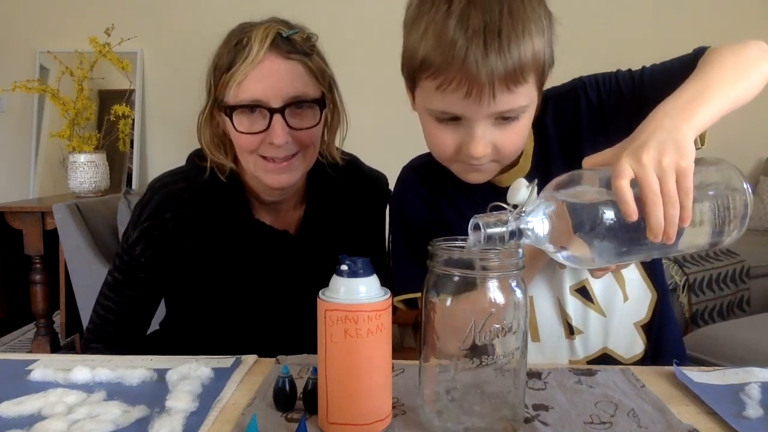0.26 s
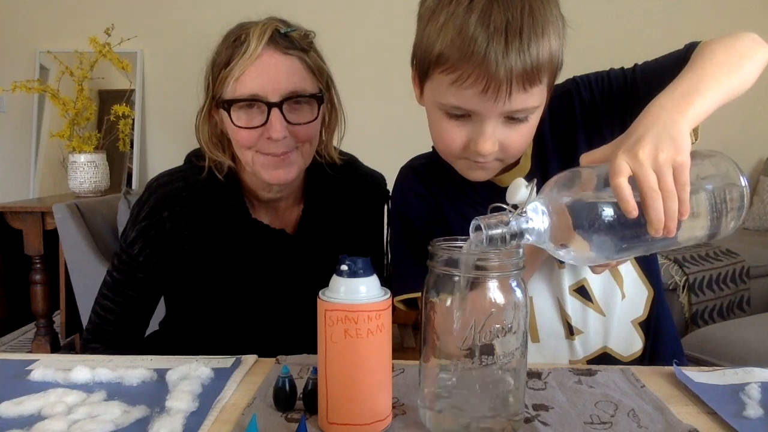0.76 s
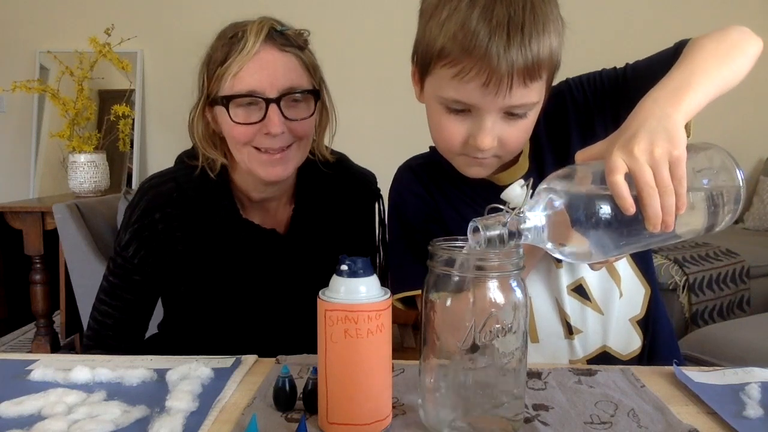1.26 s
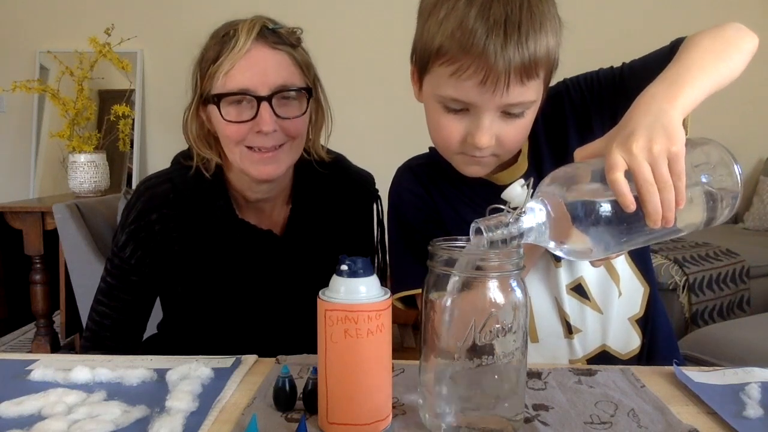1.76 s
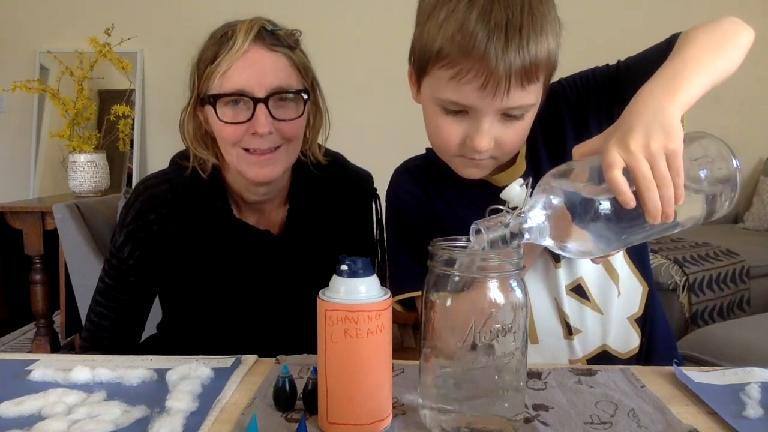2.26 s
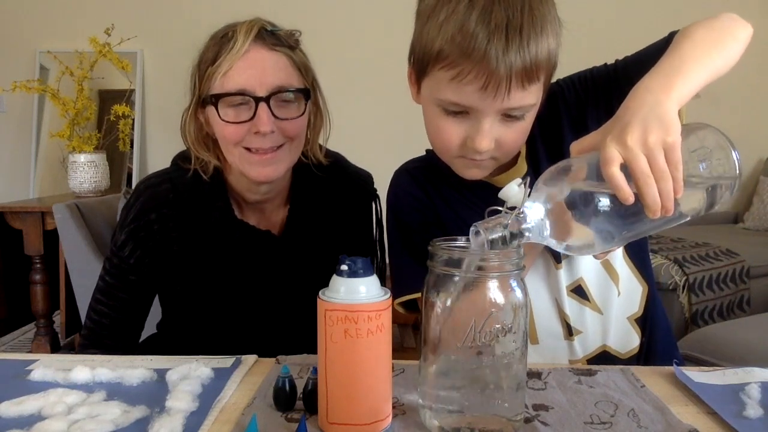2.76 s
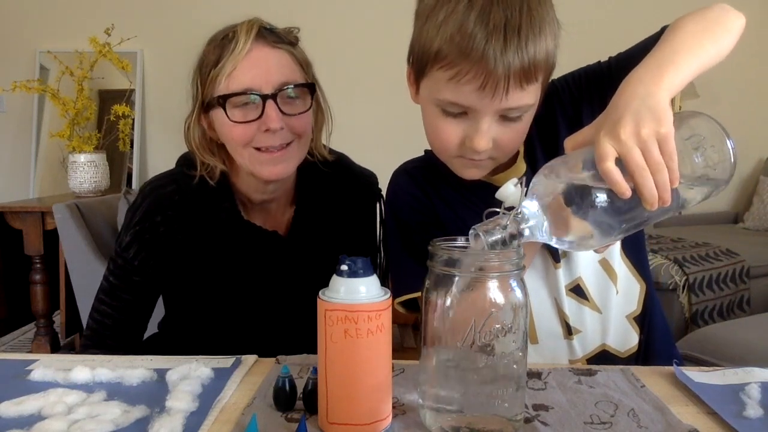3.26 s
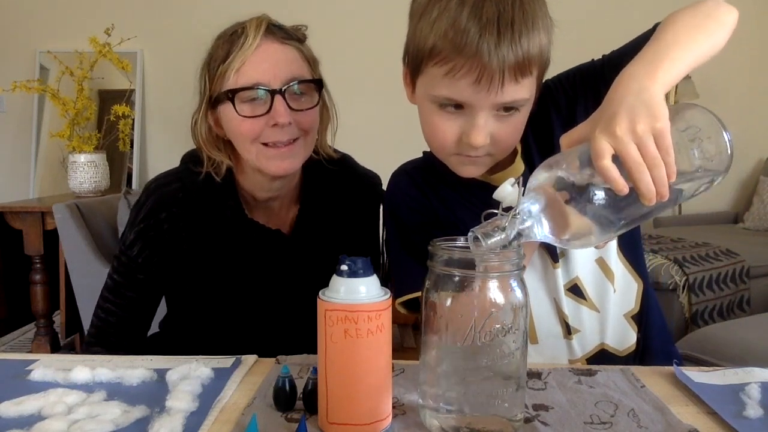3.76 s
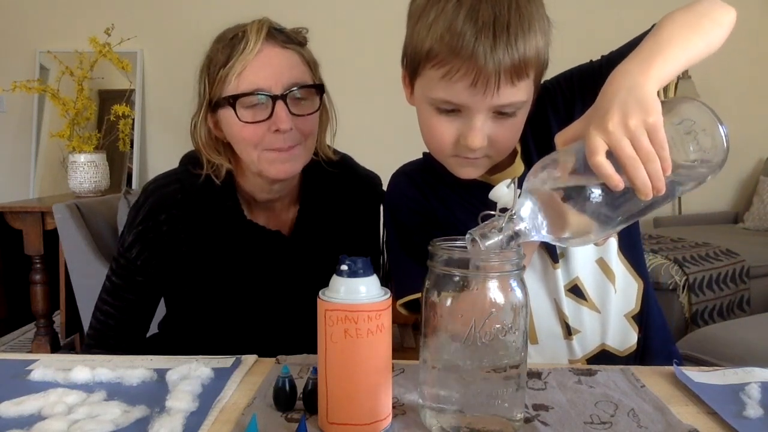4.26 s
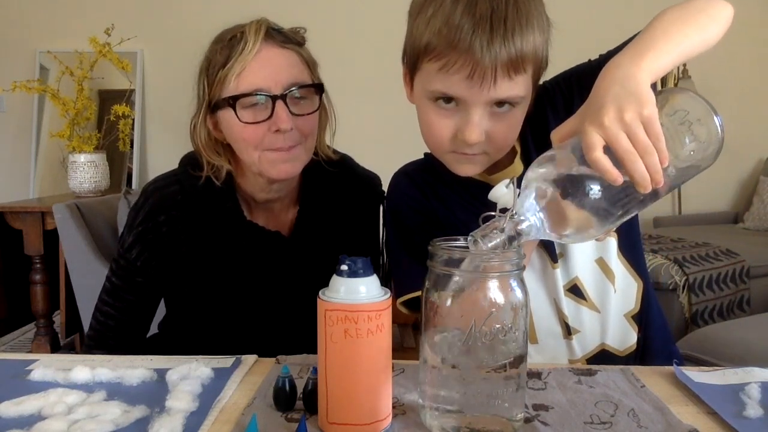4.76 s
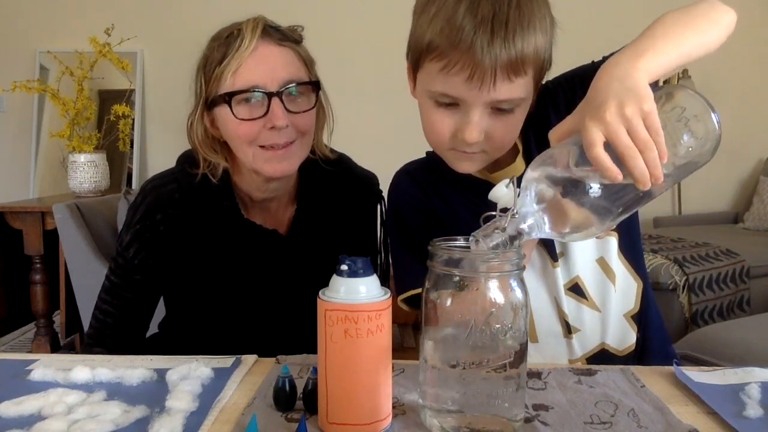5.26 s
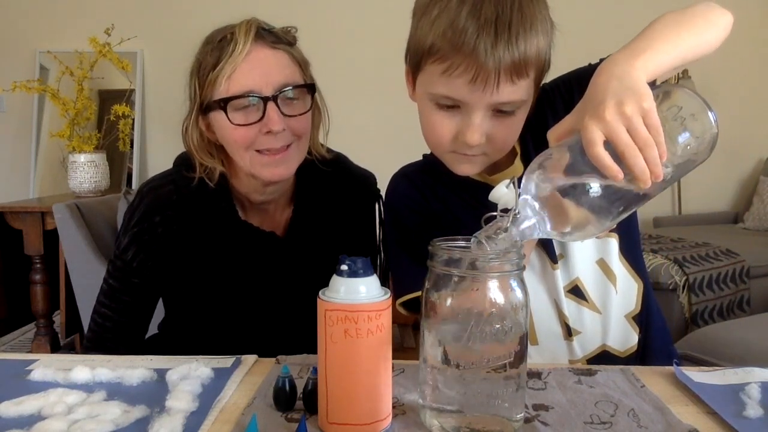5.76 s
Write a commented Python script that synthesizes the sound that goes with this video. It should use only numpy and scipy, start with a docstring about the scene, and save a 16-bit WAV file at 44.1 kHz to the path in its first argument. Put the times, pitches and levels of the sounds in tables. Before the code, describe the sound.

Close, uneven pouring of water into a glass jar, with gulping bubbles, splashing drops and a slowly climbing pitch.

```python
"""Water glugs from a tilted bottle into a glass jar on a table, close to a laptop microphone.
Large bubbles gulp and ring the air in the jar, whose note rises as the jar fills. Lumps of water thud on
the bottom. Drops splash with small bubbles, a crack of spray and a little froth; tiny bubbles fizz
between them. A small furnished room echoes briefly over a faint hum."""
import sys
import numpy as np
from scipy import signal
from scipy.fft import rfft, irfft, next_fast_len
from scipy.io import wavfile

SR = 44100
rng = np.random.default_rng(int(sys.argv[2]) if len(sys.argv) > 2 else 0)


def wav_record(signal):
    """Record a signal, one row per channel, as 16-bit PCM in the file named by sys.argv[1]."""
    frames = np.transpose(np.atleast_2d(signal))
    bounded = np.clip(frames, -1, 1)
    # unit amplitude maps onto the largest positive 16-bit level
    quanta = np.round(bounded * 32767).astype(np.int16)
    wavfile.write(sys.argv[1], SR, quanta)


N = 265437
SPAN = 12288  # samples that one sound lasts with its echoes
LEAD = 4410  # samples of fizz before the start, whose echoes reach into it

# the note of the air in the jar, rising as it fills: (time [s], pitch [Hz])
AIR_NOTE = [(0, 885), (1.5, 933), (3, 1033), (4.2, 1173), (5.2, 1286), (6, 1413)]
# bubbles trapped by falling drops: (time [s], level [dB], pitch [Hz])
PLOPS = [(0.005, -39.5, 3500), (0.022, -45.5, 2920), (0.0422, -35, 4620), (0.091, -40, 2890),
         (0.149, -36, 4500), (0.1905, -35, 5270), (0.199, -38.5, 5370), (0.2787, -42, 2900),
         (0.2957, -40.5, 3140), (0.38, -28.5, 3370), (0.4568, -29.5, 2930), (0.529, -41.5, 3280),
         (0.5776, -32.5, 5400), (0.614, -37, 3380), (0.6196, -28.5, 5250), (0.6564, -31.5, 3050),
         (0.731, -39, 5250), (0.7706, -46, 2030), (0.7896, -42, 3180), (0.8142, -38, 3500),
         (0.833, -35, 2260), (0.9095, -31, 1900), (0.943, -32, 3110), (0.9698, -32.5, 3270),
         (1.02, -37.5, 4520), (1.058, -41, 3370), (1.162, -32, 3200), (1.1918, -34.5, 3090),
         (1.2186, -36, 2960), (1.284, -40, 3640), (1.2963, -35, 3370), (1.335, -30, 5430),
         (1.3524, -41, 3340), (1.359, -30, 3330), (1.4334, -38.5, 2630), (1.4593, -29, 3280),
         (1.496, -46, 5260), (1.5178, -19.5, 3155), (1.578, -58, 3240), (1.583, -40, 2920),
         (1.603, -39, 3120), (1.617, -40, 3160), (1.6686, -50, 2060), (1.699, -34, 3420),
         (1.741, -29, 3600), (1.7667, -43, 3670), (1.8292, -36, 3200), (1.861, -32.5, 3390),
         (1.8643, -39, 3550), (1.951, -32.5, 3220), (1.9653, -33, 3400), (2.007, -33, 3500),
         (2.0582, -27.5, 1720), (2.1178, -33, 1960), (2.148, -37, 3750), (2.176, -42, 2420),
         (2.19, -56, 2800), (2.2257, -38.5, 3500), (2.278, -48, 3880), (2.296, -36.5, 3460),
         (2.347, -37, 5030), (2.3745, -25.5, 3460), (2.4258, -33, 3700), (2.467, -40, 3520),
         (2.4857, -50, 3640), (2.498, -32.5, 4880), (2.607, -36.5, 1960), (2.608, -39, 3680),
         (2.6613, -32.5, 3920), (2.711, -28, 4700), (2.7094, -39, 3480), (2.807, -49, 2160),
         (2.815, -45, 5070), (2.8433, -35, 2300), (2.852, -31.5, 4100), (2.883, -30, 3280),
         (2.9634, -41, 3380), (2.961, -39.5, 3070), (2.9865, -33.5, 3330), (3.019, -43, 4360),
         (3.0654, -26.5, 3880), (3.0976, -41, 4300), (3.158, -32, 3210), (3.2237, -29, 2580),
         (3.223, -27, 4460), (3.32, -31, 2070), (3.3742, -26.5, 4280), (3.373, -33, 2120),
         (3.4122, -28.5, 3800), (3.441, -36, 3700), (3.501, -38.5, 3680), (3.5193, -36.5, 4800),
         (3.542, -26.5, 5140), (3.589, -34.5, 3820), (3.6057, -31, 4730), (3.63, -32.5, 3840),
         (3.701, -26.5, 4220), (3.732, -34.5, 5100), (3.749, -31, 3670), (3.779, -34, 4400),
         (3.796, -27, 4050), (3.823, -32, 4200), (3.8657, -31, 3870), (3.8842, -29, 4770),
         (3.921, -31.5, 3570), (3.936, -29.5, 4400), (3.981, -39, 3700), (4.015, -51, 4300),
         (4.0138, -25.5, 4590), (4.0724, -20, 4120), (4.0739, -28.5, 2820), (4.192, -39, 4380),
         (4.2302, -36.5, 3820), (4.2958, -44, 3680), (4.41, -45, 3800), (4.364, -45.5, 2500),
         (4.4352, -27, 4400), (4.4334, -34, 2700), (4.503, -37, 5160), (4.293, -55, 1980),
         (4.535, -31, 3920), (4.58, -47, 1750), (4.579, -33, 4740), (4.584, -48, 3140), (4.6746, -36, 3550),
         (4.6915, -38.5, 3600), (4.728, -36.5, 4700), (4.762, -41, 2950), (4.7959, -32.5, 3770),
         (4.862, -57, 1980), (4.8939, -22.5, 3620), (4.9816, -43, 3640), (5.004, -38, 2900),
         (5.026, -32.5, 4850), (5.1062, -42, 3560), (5.183, -49, 2650), (5.1937, -39.5, 1890),
         (5.244, -42.5, 3600), (5.251, -35.5, 4640), (5.2908, -25, 4860), (5.337, -40, 5000),
         (5.374, -41, 3330), (5.4093, -25.5, 4650), (5.4097, -32, 3420), (5.502, -47, 3740),
         (5.515, -47.5, 3360), (5.559, -33, 4700), (5.6117, -16.5, 4010), (5.648, -27, 3450),
         (5.7082, -39, 2054), (5.7378, -31, 2130), (5.791, -40, 5000), (5.8137, -34.5, 4700),
         (5.8423, -33.5, 4270), (5.892, -41.5, 2550), (5.918, -41.5, 3730), (5.9386, -37.5, 3430),
         (5.9778, -32.5, 3430)]
# droplets thrown up and falling back: (time [s], level [dB], pitch [Hz])
DROPLETS = [(0.034, -39, 11050), (0.0964, -40.5, 7240), (0.1164, -46, 8200), (0.138, -29.5, 9840),
            (0.171, -37, 9800), (0.198, -35, 7300), (0.238, -42, 8500), (0.2835, -45, 8600),
            (0.282, -28.5, 9250), (0.377, -38, 11000), (0.381, -30, 7170), (0.4075, -30, 9300),
            (0.453, -33.5, 8430), (0.497, -27, 7230), (0.5302, -34.5, 9700), (0.578, -29.5, 9540),
            (0.61, -23.5, 9770), (0.646, -34, 7040), (0.7005, -39, 8300), (0.739, -57, 6600),
            (0.738, -27.5, 7050), (0.7711, -31.5, 7390), (0.872, -24, 9770), (0.9036, -25.5, 7170),
            (0.9398, -26, 6630), (0.987, -33.5, 9500), (1.0128, -27.5, 6800), (1.024, -22, 7370),
            (1.064, -33, 6930), (1.1128, -36.5, 8200), (1.161, -24, 7140), (1.1917, -22, 7730),
            (1.2283, -36.5, 7230), (1.284, -38, 6960), (1.294, -33.5, 7500), (1.3235, -24, 7100),
            (1.4024, -40, 5980), (1.42, -39, 6730), (1.461, -38.5, 7040), (1.469, -43, 7000),
            (1.48, -37.5, 5500), (1.521, -43, 5700), (1.5416, -33, 6700), (1.54, -31.5, 7440),
            (1.613, -32, 6900), (1.6297, -37, 6760), (1.6686, -53, 8150), (1.699, -36.5, 9000),
            (1.703, -38, 5620), (1.738, -31, 6860), (1.7673, -36, 7050), (1.798, -35.5, 10300),
            (1.8312, -44, 6220), (1.8597, -19.5, 7340), (1.9134, -43.5, 7600), (1.961, -33, 7700),
            (1.9594, -37, 7700), (1.9955, -29.5, 7150), (2.0104, -29.5, 5570), (2.058, -32, 8040),
            (2.0906, -34, 7660), (2.136, -35.5, 5700), (2.1885, -34.5, 7960), (2.233, -34, 9800),
            (2.232, -33, 6860), (2.283, -26, 7070), (2.326, -43, 7500), (2.3507, -34.5, 5260),
            (2.365, -26, 7620), (2.426, -25, 6700), (2.437, -23.5, 7140), (2.5504, -44, 6360),
            (2.5994, -30, 7600), (2.607, -36.5, 5600), (2.649, -38, 6560), (2.7044, -27, 7940),
            (2.7416, -31.5, 9500), (2.7781, -36.5, 7100), (2.78, -35, 8600), (2.818, -29.5, 7740),
            (2.8704, -45, 8300), (2.885, -21.5, 6370), (2.9132, -29, 6400), (2.948, -35, 9500),
            (2.986, -41, 8400), (3.02, -33.5, 8500), (3.064, -24.5, 6380), (3.0977, -34, 6320),
            (3.159, -30, 8200), (3.2227, -21, 6520), (3.305, -47, 5750), (3.321, -46, 10100),
            (3.3445, -47, 8900), (3.398, -32, 6500), (3.479, -53, 10900), (3.498, -29, 7150),
            (3.542, -36, 6020), (3.559, -25, 10400), (3.588, -17, 6410), (3.63, -26.5, 8760),
            (3.666, -39.5, 6260), (3.697, -31, 11500), (3.712, -31.5, 6350), (3.75, -37, 6170),
            (3.778, -40, 10900), (3.807, -36, 6800), (3.821, -32, 6240), (3.866, -37.5, 7650),
            (3.885, -36.5, 5400), (3.919, -24.5, 10750), (3.938, -29, 8500), (3.982, -34.5, 6500),
            (3.993, -37, 7460), (4.0716, -27, 6700), (4.0978, -23.5, 11000), (4.1635, -33, 7850),
            (4.195, -37.5, 5960), (4.2444, -21, 7680), (4.2932, -31.5, 5850), (4.2906, -35, 7350),
            (4.347, -42.5, 5440), (4.411, -32.5, 5330), (4.4455, -25, 8150), (4.504, -36, 8050),
            (4.533, -21.5, 7760), (4.572, -30.5, 7950), (4.6744, -31.5, 6600), (4.725, -41, 6900),
            (4.743, -40.5, 6700), (4.759, -42, 8050), (4.786, -30, 10800), (4.795, -33.5, 7640),
            (4.8189, -34, 8150), (4.8556, -39, 7270), (4.877, -32.5, 10200), (4.8946, -18.5, 7980),
            (4.969, -37, 8300), (4.9815, -32.5, 8000), (5.002, -33.5, 7200), (5.026, -46, 5080),
            (5.06, -48, 7400), (5.098, -31, 7150), (5.122, -40, 6950), (5.147, -51, 5650),
            (5.1613, -33, 7400), (5.1983, -36.5, 7600), (5.251, -49, 8340), (5.293, -28.5, 8940),
            (5.297, -21, 7400), (5.41, -34.5, 7000), (5.442, -40, 7110), (5.4677, -32, 6960),
            (5.4963, -45, 7960), (5.507, -38.5, 7700), (5.526, -41, 7340), (5.5595, -55, 10400),
            (5.6126, -37, 5850), (5.612, -31, 7800), (5.648, -35, 7350), (5.676, -43, 7300),
            (5.708, -40, 7560), (5.727, -41.5, 7500), (5.7544, -32, 7900), (5.792, -36.5, 7100),
            (5.8802, -34.5, 5730), (5.937, -42, 7500), (5.972, -37.5, 7760)]
# large bubbles: (time [s], level [dB], pitch partway up its rise [Hz], fade time [cycles])
GULPS = [(0.06, -41.5, 735, 0.92), (0.087, -48.5, 1970, 9.2), (0.381, -62, 2040, 4.8),
         (0.479, -46.5, 940, 0.69), (0.614, -43, 1660, 2.5), (0.656, -46, 860, 1.5), (0.771, -40, 1020, 1),
         (0.165, -53, 960, 0.87), (0.298, -55, 1830, 4.8), (0.904, -28, 1020, 1.33), (1.066, -36, 944, 4.5),
         (1.162, -47, 1940, 5.5), (1.215, -49.5, 650, 2), (1.231, -46, 1810, 9.5), (1.335, -42, 680, 2.4),
         (1.35, -32.5, 1020, 1.6), (1.428, -27, 968, 2.9), (1.464, -39, 980, 3.3),
         (1.518, -43.5, 890, 0.97), (1.546, -28, 1580, 1.7), (1.577, -19, 831, 3.2),
         (1.668, -44.5, 2004, 8.5), (1.699, -22.5, 1033, 3.7), (1.739, -22.5, 882, 4.1),
         (1.86, -29.5, 1060, 1), (1.897, -37, 830, 1.1), (1.913, -25, 850, 2.2), (1.993, -40, 1010, 4),
         (2.009, -34.5, 1016, 3.9), (2.029, -39.5, 887, 2.5), (2.059, -62, 1680, 3.5),
         (2.094, -29.5, 950, 0.97), (2.117, -31, 1017, 3.6), (2.152, -41, 1060, 1.2),
         (2.226, -22, 1130, 3.3), (2.348, -41.5, 670, 0.94), (2.394, -43.5, 1740, 10),
         (2.426, -21.5, 912, 3.6), (2.501, -33.5, 805, 1.8), (2.606, -56, 1900, 5.4),
         (2.701, -32, 900, 4.6), (2.819, -42, 1750, 5.2), (2.886, -30.5, 1002, 4.4),
         (2.952, -39, 1010, 1.5), (3.169, -28, 1120, 2.1), (3.302, -36, 690, 0.82), (3.374, -38, 965, 2.1),
         (3.414, -31.5, 680, 2.8), (3.42, -33, 966, 3.2), (3.51, -44, 1240, 4.2), (3.541, -34, 690, 0.82),
         (3.56, -32, 1060, 2.6), (3.604, -33, 970, 1), (3.63, -39, 1170, 2.5), (3.634, -34.5, 1670, 3.5),
         (3.782, -32, 1200, 2.2), (3.796, -28, 850, 1.8), (3.838, -36.5, 644, 5.1),
         (3.85, -27.5, 1054, 2.1), (3.882, -26.5, 1010, 1.15), (3.95, -40, 1220, 2.1),
         (3.965, -47.5, 1160, 2.2), (3.983, -22.5, 980, 2.2), (4.015, -30, 794, 1.9),
         (4.045, -45, 915, 1.9), (4.073, -24.5, 920, 1.4), (4.09, -31, 960, 1.2), (4.197, -23, 1170, 2.6),
         (4.235, -38.5, 1670, 4.3), (4.292, -46.5, 1190, 3), (4.364, -31, 620, 1.1),
         (4.436, -31.5, 1320, 0.85), (4.477, -36.5, 1150, 0.76), (4.478, -45, 500, 1.7),
         (4.544, -51.5, 1190, 4.5), (4.572, -35.5, 1180, 3), (4.608, -45, 620, 1.9),
         (4.621, -40.5, 660, 2.4), (4.633, -50, 984, 6.2), (4.674, -29.5, 897, 2.1),
         (4.677, -38.5, 1250, 3), (4.693, -48, 1490, 4.2), (4.743, -31, 1460, 7.4),
         (4.745, -33.5, 820, 1.1), (4.795, -43, 1230, 4.8), (4.827, -39.5, 690, 0.78),
         (4.903, -21, 1190, 1.66), (5.003, -31.5, 1180, 2), (5.026, -40, 736, 0.94),
         (5.104, -33.5, 1120, 1.4), (5.05, -48, 1670, 6), (5.196, -33, 1160, 1.5),
         (5.294, -31.5, 1260, 2.2), (5.295, -24.5, 1800, 1.4), (5.348, -48, 650, 0.98),
         (5.407, -23.5, 1280, 1.08), (5.411, -20.5, 910, 2.1), (5.497, -51, 1660, 5), (5.5, -53, 525, 1.7),
         (5.543, -44.5, 740, 0.7), (5.611, -31.5, 517, 2.8), (5.617, -32, 1590, 3.2),
         (5.709, -30.5, 1990, 2.6), (5.765, -42.5, 533, 2.4), (5.79, -37.5, 1450, 0.64),
         (5.843, -27, 1220, 1.1), (5.98, -35, 1474, 6.2)]
# cracks of fine spray: (time [s], level [dB])
SPRAYS = [(0.066, -45), (0.1251, -45), (0.143, -29), (0.2354, -48), (0.27, -40), (0.2823, -41),
          (0.296, -27), (0.38, -29), (0.406, -37), (0.4458, -33), (0.477, -28), (0.5791, -40),
          (0.6055, -27), (0.6725, -34), (0.699, -29), (0.7575, -28.5), (0.8727, -21.5), (0.9385, -38),
          (0.9857, -50), (1.0181, -32), (1.0625, -35), (1.158, -25.5), (1.195, -31), (1.2994, -33),
          (1.3069, -39), (1.348, -19.5), (1.4183, -39), (1.427, -34), (1.475, -36), (1.5269, -44),
          (1.545, -35), (1.6105, -40), (1.632, -34), (1.6985, -40), (1.7385, -26.5), (1.8567, -27.5),
          (1.8657, -35), (1.914, -43), (1.96, -28.5), (1.9894, -40), (2.007, -27.5), (2.0572, -43),
          (2.094, -36), (2.137, -30), (2.186, -33), (2.2268, -31), (2.281, -27.5), (2.3116, -48),
          (2.3461, -48), (2.374, -33), (2.425, -23.5), (2.549, -42), (2.6005, -35), (2.6389, -47),
          (2.6545, -34), (2.708, -27.5), (2.7591, -36), (2.7881, -34.5), (2.818, -33), (2.882, -19),
          (2.914, -23), (2.9711, -39), (3.015, -35), (3.0627, -30), (3.097, -32.5), (3.154, -27),
          (3.2211, -14.5), (3.3, -34), (3.397, -27.5), (3.455, -46), (3.475, -38), (3.494, -20.5),
          (3.557, -21.5), (3.5872, -27), (3.627, -25), (3.696, -34), (3.748, -35), (3.7774, -34.5),
          (3.816, -28), (3.892, -32.5), (3.9035, -40), (3.918, -23), (3.979, -33.5), (4.0406, -43),
          (4.073, -53), (4.095, -31), (4.151, -42), (4.1936, -30), (4.22, -31), (4.2445, -27.5),
          (4.2777, -46), (4.2894, -28), (4.348, -39.5), (4.441, -40), (4.4413, -36), (4.4762, -46),
          (4.52, -33.5), (4.532, -32), (4.572, -32), (4.6184, -47), (4.673, -31), (4.6766, -26),
          (4.7431, -45), (4.771, -32), (4.784, -40), (4.8, -32), (4.818, -30), (4.8599, -39), (4.8927, -27),
          (4.916, -32), (4.973, -31), (5.003, -30), (5.1048, -43), (5.162, -36), (5.196, -32), (5.294, -27),
          (5.3454, -38), (5.371, -39), (5.408, -24), (5.468, -36), (5.51, -38), (5.557, -35), (5.617, -31),
          (5.78, -37), (5.792, -30.5), (5.9345, -35)]


def amp(db):
    """Turn decibels into a number to multiply a sound by."""
    return 10 ** (np.asarray(db) / 20)


def curve_at(points, hz):
    """Read between (frequency, value) points, giving each octave the same space."""
    f, value = np.transpose(points)
    return np.interp(np.log(hz + 1), np.log(f + 1), value)


def resonance(f, centre_hz, width_hz):
    """How something that rings at one note answers each frequency: 1 at that note, less around it."""
    return 1j * f * width_hz / (centre_hz ** 2 - f ** 2 + 1j * f * width_hz)


def bubble(hz, db, cycles, rise, delay=0, swell=5):
    """One row per bubble: a tone that swells, soon fades and climbs in pitch as it nears the surface."""
    t = np.arange(SPAN // 8) / SR - np.reshape(delay, (-1, 1))
    turns = np.maximum(t, 0) * np.asarray(hz)[:, None]
    age = turns / np.reshape(cycles, (-1, 1))
    loudness = (1 - np.exp(-swell * age)) ** 2 * np.exp(-age)
    climb = 1 + np.reshape(rise, (-1, 1)) * np.tanh(age / 2)
    return amp(db)[:, None] * loudness * np.sin(2 * np.pi * turns * climb)


def swarm(db, low_hz, high_hz, wait_s, cycles, count):
    """For each level in db, a few bubbles of random size, each after a short random wait."""
    chance = rng.random((len(db), count, 3))
    hz = low_hz * (high_hz / low_hz) ** chance[..., 0]
    delay = -wait_s * np.log(1 - 0.98 * chance[..., 1])
    return sum(bubble(hz[:, k], db - 9 * chance[:, k, 2], cycles, rise=0.041, delay=delay[:, k])
               for k in range(count))


def room_echoes():
    """The spectra of 24 echo tails: fading noise stands for sound bouncing around the room."""
    # how long the room rings: (frequency [Hz], time to fade by 60 dB [s])
    fade_times = [(300, 0.098), (1000, 0.14), (4000, 0.12), (9000, 0.081), (15000, 0.057)]
    hz, t, bands = signal.stft(rng.standard_normal((24, SPAN * 3 // 4)), SR, nperseg=256)
    bands *= amp(1.5 * rng.standard_normal((len(bands), 1, len(t))))  # separate walls: uneven echoes
    fade = amp(-60 * t / curve_at(fade_times, hz)[:, None])
    tails = signal.istft(bands * fade, SR, nperseg=256)[1]
    tails *= 1 - np.exp(-np.arange(tails.shape[1]) / SR / 0.00018)  # the first echoes come off the table
    return rfft(tails / np.linalg.norm(tails, axis=1, keepdims=True), SPAN)


def in_jar_and_room(times, sounds, air_db, glass_db, echo_db):
    """Each sound rings the jar's air and glass, echoes in the room and is placed at its time."""
    # notes of the glass wall: (pitch [Hz], width [Hz], level [dB])
    wall_notes = [(3570, 26, -8), (4240, 24, 2.5), (4558, 41, 12.5), (5660, 46, 16), (6290, 210, 4),
                  (7016, 170, 13.5), (7757, 134, 8), (7800, 360, -2), (8470, 180, 10.5), (9460, 58, 9),
                  (11500, 50, -5)]
    # air swinging from side to side in the filling jar: (time [s], pitch [Hz])
    sideways_note = [(0, 3060), (2, 3397), (6, 3554)]
    f = np.fft.rfftfreq(SPAN, 1 / SR)
    slosh = 1 + 0.013 * rng.standard_normal(len(times))  # the water surface heaves
    air_hz = (slosh * np.interp(times, *np.transpose(AIR_NOTE)))[:, None]
    sideways_hz = np.interp(times, *np.transpose(sideways_note))[:, None]
    strike_db = 3 * rng.standard_normal((len(times), len(wall_notes), 1))  # no two sounds ring it alike
    ringing = sum((-1) ** k * amp(db + strike_db[:, k]) * resonance(f, hz, width)
                  for k, (hz, width, db) in enumerate(wall_notes))
    ringing += amp(6.5) * resonance(f, sideways_hz, width_hz=195)
    jar = 1 + amp(air_db) * resonance(f, air_hz, width_hz=41.5) + amp(glass_db) * ringing
    tails = room_echoes()
    room = 1 + amp(echo_db) * tails[np.arange(len(times)) % len(tails)]
    heard = irfft(rfft(sounds, SPAN) * jar * room, SPAN)
    where = np.round(times * SR).astype(int)[:, None] + np.arange(SPAN) + LEAD
    return np.bincount(where.ravel(), heard.ravel(), N + SPAN + LEAD)[LEAD:LEAD + N]


def hum():
    """The room's steady low noise, with a few faint, slightly wavering tones."""
    # tone colour of the noise: (frequency [Hz], relative level [dB])
    noise_colour = [(60, -6), (120, 9.5), (190, -8.5), (260, 11), (350, 1), (500, 5), (600, 11), (700, 1.5),
                    (900, -8), (1500, -45), (4000, -50)]
    # faint steady tones: (pitch [Hz], level [dB])
    hum_tones = [(258, -85), (398, -84), (497, -80), (598, -76)]
    size = next_fast_len(N)
    colour = amp(curve_at(noise_colour, np.fft.rfftfreq(size, 1 / SR)))
    noise = irfft(rfft(rng.standard_normal(size)) * colour, size)[:N]
    hz, db = np.transpose(hum_tones)[..., None]
    drift = 0.01 * np.cumsum(rng.standard_normal((len(hz), N)), axis=1)  # radians
    tones = np.sqrt(2) * amp(db) * np.sin(2 * np.pi * hz * np.arange(N) / SR + drift)
    return amp(-72) * noise / np.std(noise) + tones.sum(axis=0)


def fizz(count=360):
    """Small groups of tiny bubbles burst in a loose, steady patter that keeps the jar ringing."""
    # how strong the fizz is: (time [s], level [dB])
    strength = [(0.0, -39), (0.42, -73), (0.55, -52), (2.73, -53), (2.9, -53), (3.35, -45), (3.67, -52),
                (3.94, -47), (4.31, -55.5), (5.53, -73), (5.67, -35.5), (6.02, -58)]
    chance = rng.random((count, 2))
    times = ((np.arange(count) + chance[:, 0]) / count * (N + LEAD) - LEAD) / SR
    db = np.interp(times, *np.transpose(strength)) - 5.4 * np.log(1 - 0.93 * chance[:, 1])
    trickle = swarm(db - 8, low_hz=3350, high_hz=10270, wait_s=0.0059, cycles=13.4, count=3)
    sparkle = swarm(db - 15, low_hz=9230, high_hz=14600, wait_s=0.02, cycles=27, count=3)
    patter = swarm(db - 19, low_hz=470, high_hz=2230, wait_s=0.011, cycles=5.9, count=1)
    return in_jar_and_room(times, trickle + sparkle + patter, air_db=9, glass_db=-6, echo_db=-5)


def splashes():
    """Falling drops trap bubbles, throw up droplets and scatter a fine spray."""
    plop_times, db, hz = np.transpose(PLOPS)
    plop = bubble(hz, db + 1.5, cycles=5.37, rise=0.0025, swell=2.77)
    plop += swarm(db - 5.5, 0.678 * hz[:, None], 1.34 * hz[:, None], wait_s=0.0064, cycles=2.28, count=5)
    plop += bubble(0.67 * hz, db - 9, cycles=1, rise=0)  # the slap as the drop lands
    drop_times, db, hz = np.transpose(DROPLETS)
    drop = bubble(hz, db + 2.5, cycles=8, rise=0.014, swell=5.84)
    drop += swarm(db - 4, 0.866 * hz[:, None], 1.339 * hz[:, None], wait_s=0.0057, cycles=8.1, count=3)
    spray_times, db = np.transpose(SPRAYS)
    spray = swarm(db - 0.1, low_hz=10010, high_hz=14870, wait_s=0.0038, cycles=8, count=5)
    times = np.concatenate([plop_times, drop_times, spray_times])
    sounds = np.concatenate([plop, drop, spray])
    return in_jar_and_room(times, sounds, air_db=6.5, glass_db=-8, echo_db=-3)


def froth(events, softer_db, air_db, cycles, count):
    """The water settles after a splash or gulp: bubbles near its pitch burst, the later the weaker."""
    typical_wait_s, fade_db_per_s = 0.036, 294
    times, db, hz = np.repeat(events, count, axis=0).T
    chance = rng.random((len(times), 2))
    wait = -typical_wait_s * np.log(1 - 0.95 * chance[:, 0])
    db = db - softer_db - fade_db_per_s * wait - 6 * chance[:, 1]
    bursts = swarm(db, 0.723 * hz[:, None], 1.345 * hz[:, None], wait_s=0.006, cycles=cycles, count=2)
    return in_jar_and_room(times + wait, bursts, air_db, glass_db=9, echo_db=-8.5)


def thuds():
    """A lump of water lands on the bottom with one low push."""
    # lumps of water landing: (time [s], level [dB], pitch [Hz])
    landings = [(0.056, -76, 293), (0.358, -72, 230), (0.791, -68, 194), (0.904, -63, 257),
                (1.064, -53, 220), (1.214, -48, 242), (1.698, -58, 269), (1.915, -60.5, 264),
                (2.23, -61.5, 250), (2.346, -62, 260), (2.428, -54, 250), (2.497, -58, 278),
                (3.118, -59, 246), (4.012, -54.5, 298), (4.364, -62, 287), (4.899, -47, 265),
                (5.407, -47.5, 288), (5.611, -56.5, 310)]
    times, db, hz = np.transpose(landings)
    pushes = bubble(hz, db + 9.5, cycles=1.33, rise=0)
    return in_jar_and_room(times, pushes, air_db=26, glass_db=2, echo_db=-3.5)


def gulps():
    """Pockets of air pinch off under the stream and shed smaller ones."""
    times, db, hz, cycles = np.transpose(GULPS)
    below_air_note = np.maximum(np.interp(times, *np.transpose(AIR_NOTE)) / hz - 1, 0)
    rise = 0.035 + 0.11 * below_air_note  # the largest pockets open at the surface and climb furthest
    pockets = bubble(hz / (1 + 0.47 * rise), db + 2.5, cycles, rise)
    burble = swarm(db - 4, low_hz=700, high_hz=1550, wait_s=0.011, cycles=1.8, count=2)
    return in_jar_and_room(times, pockets + burble, air_db=7.5, glass_db=13, echo_db=-3.5)


def scene():
    """The pouring water, its froth and the room's hum, added up in one channel."""
    spray_events = [(time, db, 12600) for time, db in SPRAYS]  # spray froth lies around 12600 Hz
    gulp_events = [row[:3] for row in GULPS]
    settling = froth(PLOPS + DROPLETS, softer_db=10.5, air_db=6, cycles=5.1, count=3)
    settling += froth(spray_events, softer_db=9, air_db=-5, cycles=8, count=4)
    settling += froth(gulp_events, softer_db=18.5, air_db=14.5, cycles=1.8, count=3)
    return (gulps() + thuds() + splashes() + settling + fizz() + hum())[None]


def record(dry):
    """The small microphone loses the bass and adds hiss; the very highest treble is cut off."""
    bass_cut_hz, treble_cut_hz, hiss_db = 170, 16300, -76
    thin = signal.sosfilt(signal.butter(4, bass_cut_hz, "highpass", fs=SR, output="sos"), dry)
    hissy = thin + amp(hiss_db) * rng.standard_normal(dry.shape)
    size = next_fast_len(N + SR // 4)
    kept = np.fft.rfftfreq(size, 1 / SR) < treble_cut_hz
    return irfft(rfft(hissy, size) * kept, size)[:, :N]


dry = scene()
out = record(dry)
wav_record(out)
```